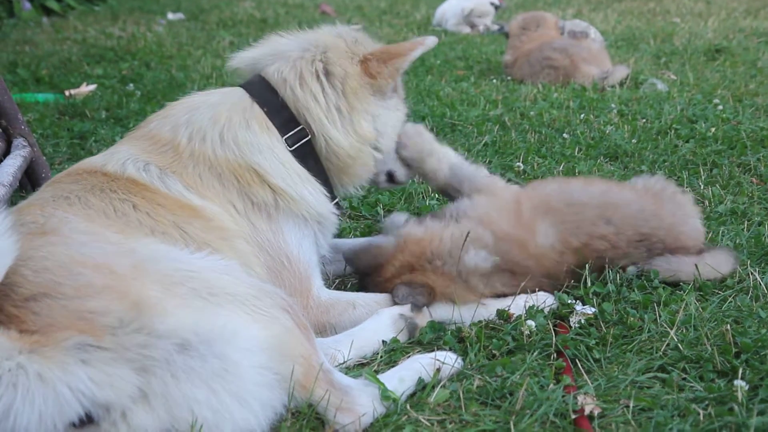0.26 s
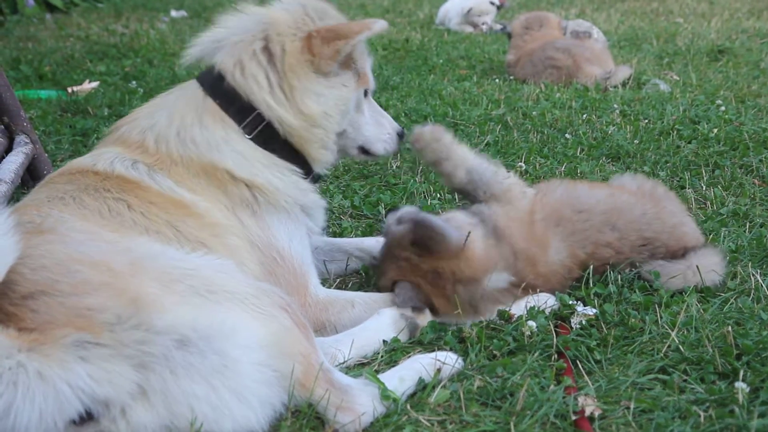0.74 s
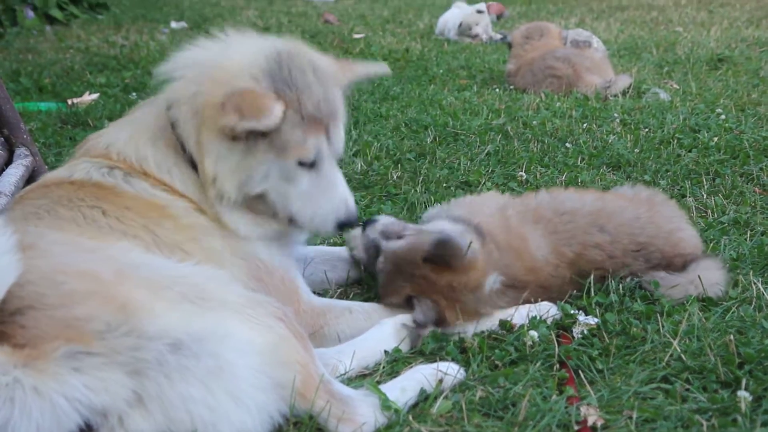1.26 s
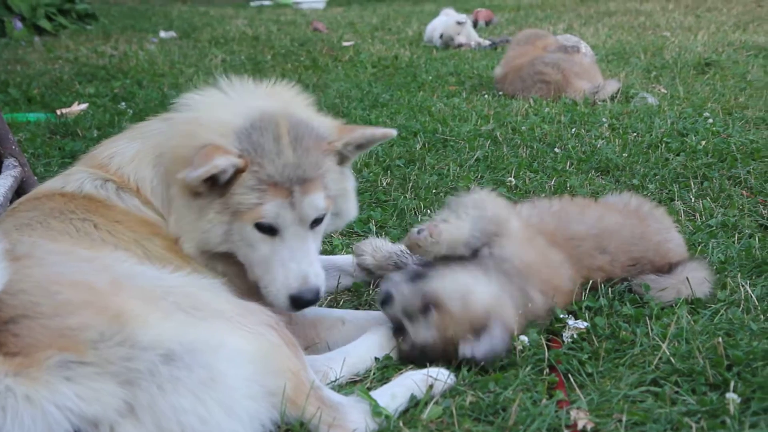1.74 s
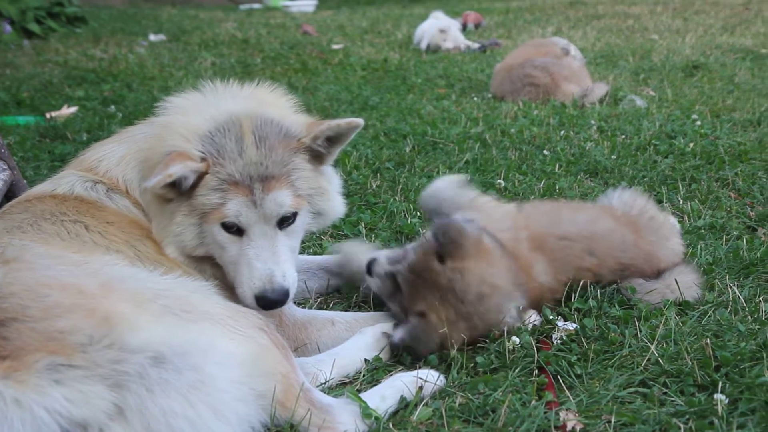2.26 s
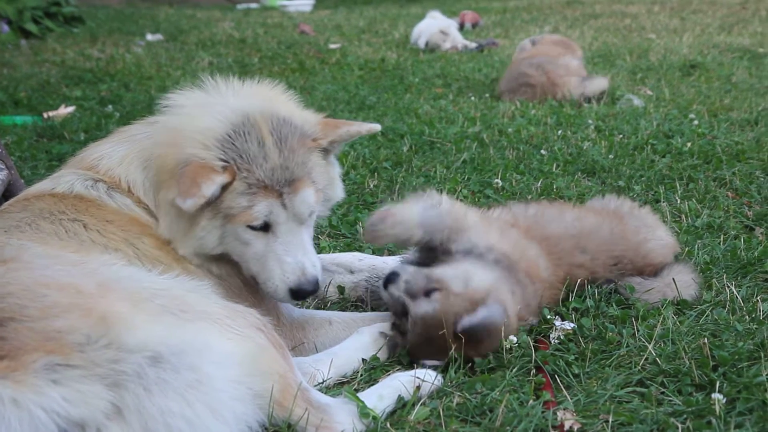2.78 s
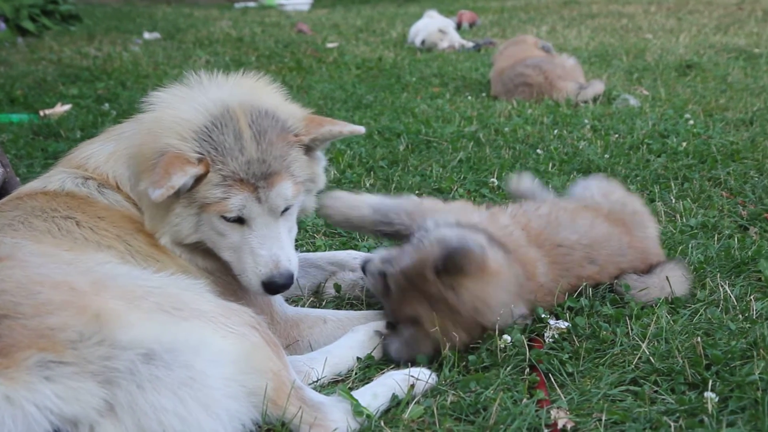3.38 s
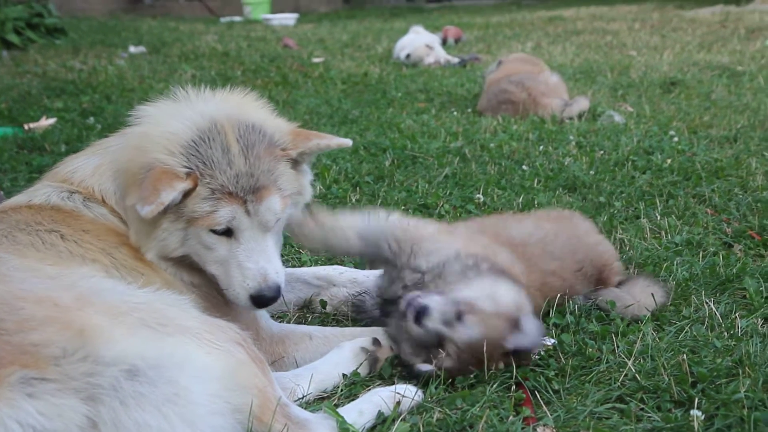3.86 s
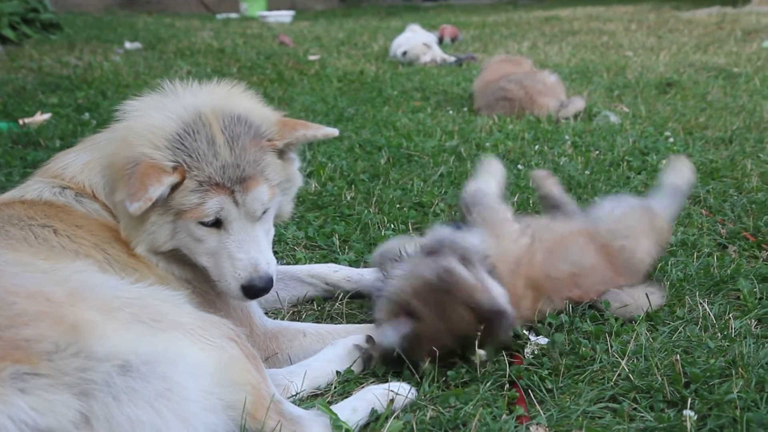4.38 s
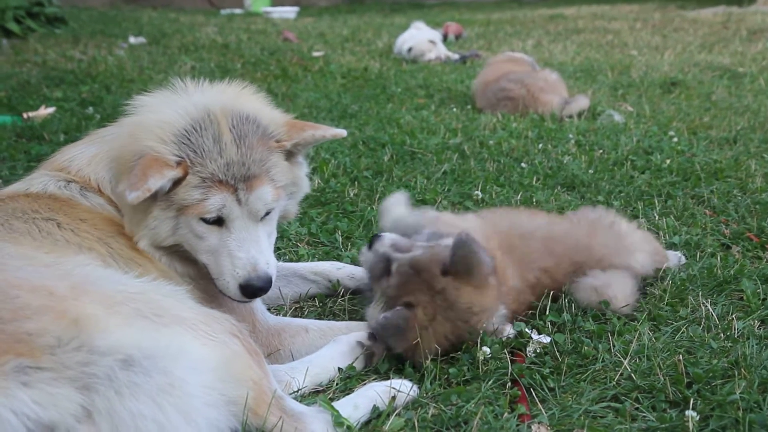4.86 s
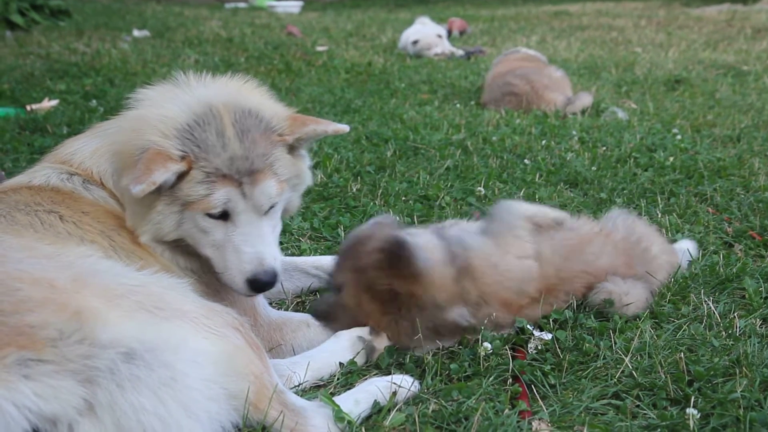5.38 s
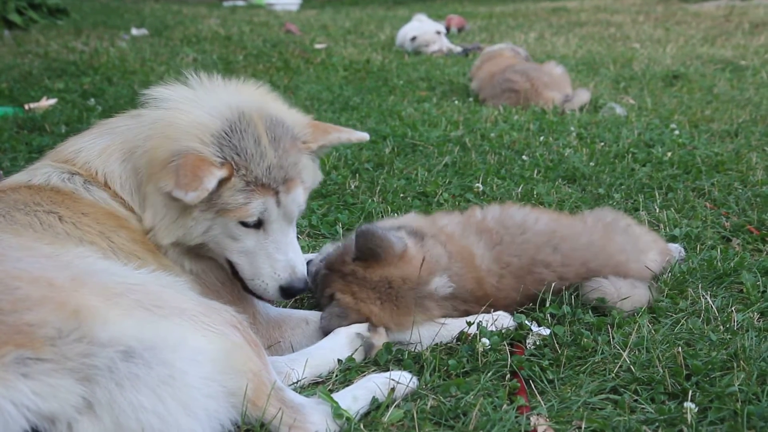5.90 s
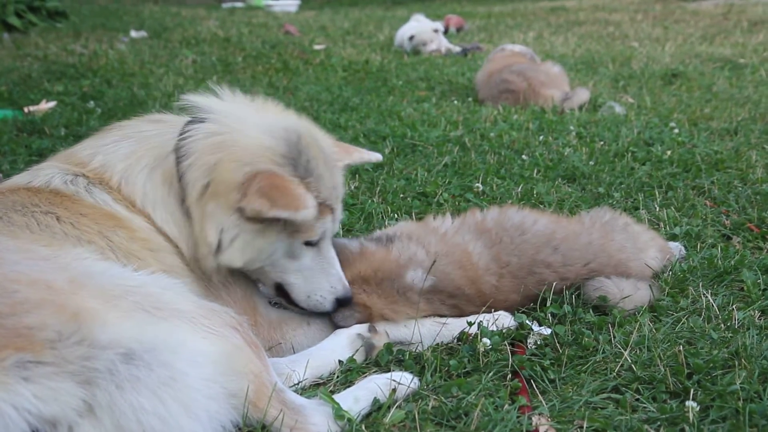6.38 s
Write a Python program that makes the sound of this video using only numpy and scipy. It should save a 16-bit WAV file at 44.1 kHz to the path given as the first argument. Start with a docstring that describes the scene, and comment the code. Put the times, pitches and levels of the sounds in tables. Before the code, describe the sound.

In a quiet garden, a short gritty scrape and dry grass ticks open the first 0.1 seconds. A soft mouth thump comes at 0.3, then a puppy's hollow pops and sharp tooth snaps at 1.1-1.9, a strong pop cluster at 2.6-2.8, and a snap at 3.0. After sparser contacts, loud pops and clacks bunch at 4.4-4.6, the heaviest smack lands at 5.2, and quick irregular mouthing runs from 5.4 to 6.0, thinning to the end at 6.6. Rolling grass rustle swells near 1.4, 3.6, 4.55, 5.05 and 5.95. Sparrows chirrup, double-note and trill in clear downward glides throughout, with cheeps between, echoing lightly. A grasshopper rasps rapidly until 1.1, again from 2.9 to 5.25, and from 5.45 onward, above constant far insect hiss, soft air, faint hum and a thin high whine. Mono, bites close and dry.

```python
"""Sharp snaps and hollow lip pops are heard as a puppy rolls and plays on a lawn, with rustling grass.
Each bite adds damped tones for head and mouth to short noise cracks for jaws and teeth.
Sparrows chirp in gliding whistles; a grasshopper buzzes in bouts of pulsed noise over a far insect hiss.
Filtered noise makes the outdoor air and hum, and a sine makes a thin high whine.
Short echoes from the ground and garden walls follow the bites and the birds."""
import sys
import numpy as np
from scipy import signal
from scipy.fft import rfft, irfft
from scipy.io import wavfile
from scipy.ndimage import uniform_filter1d, minimum_filter1d, map_coordinates

SR = 44100
rng = np.random.default_rng(int(sys.argv[2]) if len(sys.argv) > 2 else 0)


def wav_record(signal):
    """Record a signal, one row per channel, as 16-bit PCM in the file named by sys.argv[1]."""
    frames = np.transpose(np.atleast_2d(signal))
    bounded = np.clip(frames, -1, 1)
    # unit amplitude maps onto the largest positive 16-bit level
    quanta = np.round(bounded * 32767).astype(np.int16)
    wavfile.write(sys.argv[1], SR, quanta)


N = 292824
TIME = np.arange(N) / SR  # seconds

# Snaps and smacks of the puppy's mouth. Each row: start in seconds, head thump level in dB,
# hollow pop level in dB, pop pitch in Hz, jaw clack level in dB, tooth snap level in dB.
BITES = [(.32, -31, -37, 487, -59, -67), (1.074, -26.5, -26, 708, -70, -74),
         (1.327, -25.5, -30.5, 520, -28, -21.5), (1.389, -37, -28.5, 860, -34, -47),
         (1.539, -36, -41, 455, -51, -71), (1.803, -30.5, -31.5, 506, -24, -16.5),
         (1.853, -30, -24, 716, -21.5, -27), (1.878, -31, -32, 706, -21, -20.5),
         (2.178, -40, -43, 775, -49, -62), (2.623, -21.5, -14, 750, -33.5, -59),
         (2.694, -31.5, -20.5, 726, -23, -17.5), (2.783, -27.5, -33, 504, -64, -44),
         (3.002, -30.5, -27.5, 570, -22, -21.5), (3.485, -37, -44, 500, -46, -54),
         (3.704, -35, -31, 680, -30, -38), (3.83, -53, -37, 473, -40, -63),
         (4.138, -44.5, -41.5, 630, -52, -56), (4.402, -50, -44, 630, -36, -45),
         (4.457, -19, -14, 482, -32.5, -55), (4.462, -27, -17, 575, -38, -57),
         (4.609, -19, -13.5, 547, -16, -50), (4.617, -29, -13, 582, -19.5, -20),
         (4.624, -28, -15, 686, -57, -19.5), (4.848, -34, -34, 700, -58, -68),
         (4.88, -36, -37.5, 760, -64, -71), (4.958, -40, -30, 717, -52, -61),
         (4.985, -29.5, -25.5, 780, -31, -61), (5.015, -45, -27.5, 348, -33.5, -37),
         (5.198, -13, -10, 468, -16.5, -21), (5.447, -30, -24, 730, -36, -58),
         (5.458, -56, -22, 705, -31, -24.5), (5.475, -40, -18.5, 754, -26, -54),
         (5.576, -42, -27.5, 775, -33, -39), (5.667, -52, -30.5, 510, -45, -59),
         (5.726, -25.5, -23.5, 760, -27.5, -61), (5.851, -22, -22.5, 410, -21.5, -39),
         (5.873, -39, -24, 670, -47, -55), (5.883, -27, -19.5, 633, -29.5, -46),
         (5.947, -30, -28.5, 390, -25.5, -34), (6.02, -38, -27, 714, -35, -55),
         (6.255, -55, -39, 563, -45, -54), (6.578, -33.5, -36.5, 450, -62, -66)]
# Tone colour of the jaws closing. Each row: frequency in Hz, relative level in dB.
JAW_COLOUR = [(300, -73), (800, -6), (1200, 3.5), (1800, -1), (2800, 1), (3600, -4.5), (5000, -7),
              (9000, -14)]
# Tone colour of the teeth meeting. Each row: frequency in Hz, relative level in dB.
TOOTH_COLOUR = [(1000, -68), (3000, -4.5), (4500, 0), (5100, 2), (6000, 5.5), (8300, -0.5), (10500, -9.5),
                (12500, -11), (16000, -21)]
# The puppy's body rings on after each thump. Each row: pitch in Hz, level against the thump in dB,
# time to fade by 60 dB in seconds.
BODY_RINGS = [(156.5, -12.5, 0.081), (336.6, -15, 0.12)]
# A stronger pop tightens the thump. Each row: pop level in dB, settled thump pitch in Hz.
THUMP_PITCH = [(-39, 203), (-27, 274), (-19.5, 303)]
# Bare teeth meet bright, lips dull a soft contact. Each row: tooth snap level in dB, top edge in Hz.
CONTACT_EDGE = [(-21, 4940), (-20, 10500)]

# Fur dragging through grass. Each row: time in seconds, level in dB.
RUSTLE_LEVEL = [(0, -45.5), (.12, -41), (.16, -71), (1.0, -70), (1.4, -49.5), (2.0, -56), (2.9, -78),
                (3.6, -47), (4.2, -50.5), (4.55, -36.5), (4.75, -48), (5.05, -40.5), (5.35, -56.5),
                (5.95, -37), (6.2, -56), (6.64, -48)]
# Tone colour of the crumpling blades. Each row: frequency in Hz, relative level in dB.
GRASS_COLOUR = [(40, -22), (120, 2.5), (250, 9.5), (700, 3), (1500, -5.5), (4000, -3.5), (8000, -15),
                (16000, -77)]
# Dry ticks of grass stalks. Each row: start in seconds, level in dB.
STALK_TICKS = [(0.0422, -43), (0.048, -39), (0.072, -33.5), (0.1031, -33), (1.975, -45.5), (4.037, -53)]
# Tone colour of a stalk tick. Each row: frequency in Hz, relative level in dB.
TICK_COLOUR = [(500, 5), (1200, 3), (4000, 2), (8000, 7.5), (11000, 4.5), (16000, -12)]
# Tone colour of the gritty scrape. Each row: frequency in Hz, relative level in dB.
SCRAPE_COLOUR = [(100, -24), (500, -8), (880, 6), (1500, -2), (2200, -20), (6000, -9), (10000, -12),
                 (16000, -28)]

# Syllables of the sparrows' three phrases. Each row: start in seconds into the phrase,
# length in seconds, start pitch in Hz, middle pitch in Hz, end pitch in Hz, level against the phrase in dB.
# The pitches are those at pitch factor 1.
CHIRRUP_SYLLABLES = [(0, .047, 4080, 4647, 3580, 1), (0.059, 0.0342, 3515, 3107, 2660, -4.5),
                     (0.084, .035, 2800, 3700, 3000, -1)]
DOUBLE_SYLLABLES = [(0, .024, 5750, 6030, 6080, -11.5), (.034, .055, 4550, 4530, 3740, -1),
                    (.102, .058, 4624, 4580, 3195, 2.5), (.195, .022, 3320, 3850, 3500, -0.5)]
TRILL_SYLLABLES = [(0, .036, 6390, 5800, 5250, -15), (.04, .056, 3436, 4332, 3640, 0),
                   (.088, 0.03, 4220, 6080, 5180, -13.5), (.105, .055, 3707, 4457, 3107, 1),
                   (.152, .036, 6700, 6200, 5000, -19.5), (.177, .056, 3695, 4344, 2740, -3),
                   (.256, .033, 2740, 3400, 2800, -5.5)]
# Zigzag second voice of two phrases. The one row: start in seconds into the phrase, length in seconds,
# start pitch in Hz, end pitch in Hz, level against the phrase in dB. Pitches are at factor 1.
DOUBLE_WARBLE = (0.2, 0.03, 3398, 2948, 4)
TRILL_WARBLE = (0.13, 0.1343, 3551, 2951, -5)
# When each phrase is sung. Each row: start in seconds, pitch factor,
# level in dB before the birds' shared level.
CHIRRUP_CALLS = [(.401, 1, -36.5), (2.071, 1.02, -34.5), (4.103, .997, -32.5)]
DOUBLE_CALLS = [(2.493, 0.96, -40.5), (5.302, 0.99, -39.5), (5.624, 1.003, -38)]
TRILL_CALLS = [(.589, 1, -29.5), (2.949, 0.96, -32), (4.372, .995, -31.5), (5.816, 0.99, -30)]
# Single cheeps. Each row: start in seconds, length in seconds, top pitch in Hz,
# level in dB before the birds' shared level.
CHEEPS = [(1.105, .034, 5700, -54), (1.166, .045, 5080, -53), (1.497, 0.096, 4790, -51.5),
          (2.357, .03, 6400, -46.5), (2.391, 0.057, 4954, -39.5), (2.759, 0.068, 4960, -40.5),
          (2.848, .039, 4390, -38.5), (3.16, 0.032, 6200, -47), (3.193, 0.046, 4840, -37),
          (3.286, 0.032, 4410, -40), (3.719, 0.041, 3796, -33.5), (3.777, 0.025, 3460, -32),
          (3.813, 0.015, 3650, -31.5), (3.826, .06, 4300, -43), (3.856, 0.019, 3310, -35),
          (4.965, 0.022, 4900, -50), (5.024, 0.036, 4890, -42.5)]
# Low cheeps drop further at the end. Each row: top pitch in Hz, end pitch as a share of the top.
CHEEP_END = [(3400, 0.743), (4800, .89)]

# Bouts of the near grasshopper. Each row: start in seconds, end in seconds, level in dB.
BOUTS = [(-.1, 1.099, -54), (2.9, 5.26, -55), (5.443, 6.694, -54.5)]
# Tone colour of its wings. Each row: frequency in Hz, relative level in dB.
WING_COLOUR = [(5000, -47), (7000, -16), (8200, -4), (9000, -10), (10000, 1), (10800, -10), (12000, -20),
               (15000, -25)]
# Tone colour of the far insects. Each row: frequency in Hz, relative level in dB.
CHORUS_COLOUR = [(5000, -18), (7000, -8), (8200, 1.5), (10000, -1.5), (11200, -9.5), (13000, -24)]
# Tone colour of the steady garden air. Each row: frequency in Hz, relative level in dB.
AIR_COLOUR = [(20, -16), (50, 0.5), (100, 0), (200, 3.5), (400, -2.5), (800, -3.5), (1200, -8),
              (2000, -12.5), (2900, -24), (4300, -10.5), (6500, -17), (11000, -41), (13000, -32),
              (16000, -24)]
# Far machine hum. Each row: centre in Hz, width in Hz, level in dB.
HUM_BANDS = [(1410, 344, -51.5), (2670, 670, -57.5), (3356, 210, -52.5), (3640, 330, -56)]


def bites():
    """The puppy's snaps and smacks, one after another."""
    out = np.zeros(N)
    for start, *settings in BITES:
        add(out, start, bite(*settings))
    return out


def bite(thump_db, pop_db, pop_hz, clack_db, snap_db):
    """A bite thumps the head, rings the hollow of the mouth, and may clack the jaws and teeth."""
    t = np.arange(4096) / SR
    steady = np.ones(len(t))
    thump_hz = np.interp(pop_db, *np.transpose(THUMP_PITCH))
    edge_hz = np.interp(snap_db, *np.transpose(CONTACT_EDGE))

    # the thump starts 11 % high and quickly settles
    falling_hz = thump_hz * (1 + 0.11 * np.exp(-t / 0.0036))
    thump = ring(t, falling_hz, t60=0.026, rise=0.0015)
    for hz, db, t60 in BODY_RINGS:
        thump += amp(db) * ring(t, hz * steady, t60, rise=0.005)

    pop = ring(t, pop_hz * steady, t60=0.017, rise=0.0006)
    second_mode = ring(t, 1.403 * pop_hz * steady, t60=0.013, rise=0.00006)
    pop += amp(-9) * second_mode

    clack = crack(t, JAW_COLOUR, edge_hz, decay=0.003, bounce_db=-22, bounce_s=0.0087, bounce_decay=0.0029)
    snap = crack(t, TOOTH_COLOUR, edge_hz, decay=0.002, bounce_db=-12.5, bounce_s=0.0045,
                 bounce_decay=0.0032)
    return amp(thump_db) * thump + amp(pop_db) * pop + amp(clack_db) * clack + amp(snap_db) * snap


def ring(t, hz, t60, rise):
    """A soft-edged fading tone whose pitch may move; like any small source it radiates no deep bass."""
    tone = np.sin(2 * np.pi * np.cumsum(hz) / SR)
    fade = amp(-60 * t / t60)
    onset = 1 - np.exp(-t / rise)
    bass_cut = signal.butter(2, hz[-1] / 2, "high", fs=SR)
    return burst(signal.lfilter(*bass_cut, tone * fade * onset))


def crack(t, points, edge_hz, decay, bounce_db, bounce_s, bounce_decay):
    """A hard contact, dulled above edge_hz, and its scattered bounce off the ground."""
    late = np.maximum(t - bounce_s, 0) / bounce_decay
    bounce = amp(bounce_db) * late * np.exp(1 - late)
    shape = np.exp(-t / decay) + bounce
    contact = colour(rng.standard_normal(len(t)) * shape, points)
    return burst(signal.lfilter(*signal.butter(2, edge_hz, fs=SR), contact))


def grass():
    """Blades crumple in clumps of tiny clicks under the rolling puppy; a few stalks tick."""
    clumps = amp(4.5 * wander(40, N))
    clicks = rng.random(N) < 4000 / SR  # about 4000 a second
    grains = rng.standard_normal(N) * clicks * clumps
    level = amp(np.interp(TIME, *np.transpose(RUSTLE_LEVEL)))
    out = evened(colour(grains, GRASS_COLOUR)) * level

    tick_fade = np.exp(-np.arange(1024) / SR / .0007)
    for start, db in STALK_TICKS:
        tick = colour(rng.standard_normal(len(tick_fade)) * tick_fade, TICK_COLOUR)
        add(out, start, amp(db) * burst(tick))
    return out


def scrape(db=-42):
    """A short gritty scrape in the grass as the play begins: noise of quickly wandering strength."""
    gate = np.interp(TIME, [.095, .115], [1, 0])
    grit = rng.standard_normal(N) * amp(3.3 * wander(320, N))
    return amp(db) * gate * evened(colour(grit, SCRAPE_COLOUR))


def sparrows():
    """Chirrups, double notes and trills, along with single cheeps, all sung as gliding whistles."""
    out = phrases(CHIRRUP_CALLS, CHIRRUP_SYLLABLES)
    out += phrases(DOUBLE_CALLS, DOUBLE_SYLLABLES, DOUBLE_WARBLE)
    out += phrases(TRILL_CALLS, TRILL_SYLLABLES, TRILL_WARBLE)
    for start, length, top_hz, db in CHEEPS:
        start_hz = .92 * top_hz
        end_hz = top_hz * np.interp(top_hz, *np.transpose(CHEEP_END))
        add(out, start, amp(db) * syllable(length, start_hz, top_hz, end_hz))
    return out


def phrases(calls, syllables, second_voice=None):
    """Sings one phrase again and again, each time at its own pitch and strength."""
    out = np.zeros(N)
    for start, pitch, call_db in calls:
        for at, length, start_hz, middle_hz, end_hz, db in syllables:
            note = syllable(length, pitch * start_hz, pitch * middle_hz, pitch * end_hz)
            add(out, start + at, amp(call_db + db) * note)
        if second_voice:
            at, length, start_hz, end_hz, db = second_voice
            note = warble(length, pitch * start_hz, pitch * end_hz)
            add(out, start + at, amp(call_db + db) * note)
    return out


def syllable(length, start_hz, middle_hz, end_hz, middle_at=0.413, push_db=4):
    """One side of the syrinx, the bird's voice organ, glides from start through middle to end pitch."""
    u = np.linspace(0, 1, round(length * SR))  # share of the syllable passed
    side = np.interp(u, [0, middle_at, 1], [1, 0, 1])
    nearness = 1 - side ** 1.6  # 1 at the middle pitch, 0 at either end
    outer_hz = np.where(u < middle_at, start_hz, end_hz)
    push = amp(push_db * (u - .5))  # the bird leans into the second half
    rasp = np.interp(middle_hz, [4700, 5800], [.02, .06])  # the highest notes are squeezed and raspy
    return push * whistle(outer_hz + (middle_hz - outer_hz) * nearness, rasp)


def warble(length, start_hz, end_hz, warble_hz=38, warble_depth=0.0985):
    """The other side of the syrinx zigzags down beside the main whistle."""
    size = round(length * SR)
    turns = np.cumsum(warble_hz * (1 + 0.18 * wander(41.5, size))) / SR
    zigzag = 1 + warble_depth * np.cos(2 * np.pi * turns)
    return whistle(np.linspace(start_hz, end_hz, size) * zigzag, waver=0.02)


def whistle(hz, waver, flutter_db=3, overtone_db=-32):
    """A bird tone on a pitch track; the stronger its quick random tremble, the raspier it sounds."""
    size = len(hz)
    phase = 2 * np.pi * np.cumsum(hz * (1 + waver * wander(703.0, size))) / SR
    tone = np.sin(phase) + amp(overtone_db) * np.sin(2 * phase)
    edges = signal.windows.tukey(size, 1 / 6)
    flutter = amp(flutter_db * wander(242.5, size))
    return evened(edges * flutter * tone)


def garden(x, near_db, near_t60, wall_db, wall_s, wall_t60):
    """Scatter from things close by, and a swell of echoes from the walls building up over wall_s."""
    t = np.arange(SR // 2) / SR
    taps = rng.choice([-1., 1.], len(t)) * (rng.random(len(t)) < 4000 / SR)
    near = taps * (t > .004) * amp(-60 * t / near_t60)
    walls = taps * np.minimum(t / wall_s, 1) ** 4 * amp(-60 * t / wall_t60)
    echo = amp(near_db) * near / np.linalg.norm(near)
    echo += amp(wall_db) * walls / np.linalg.norm(walls)
    return x + signal.fftconvolve(x, echo)[:N]


def grasshopper(strokes_per_s=37.2, stroke_width=0.27, bout_edge_s=0.064, chorus_db=-54):
    """One near insect rasps in bouts, once a wing stroke, over the hiss of many far ones."""
    near = np.zeros(N)
    for start, end, db in BOUTS:
        turns = np.cumsum(strokes_per_s * (1 + 0.01 * wander(11, N))) / SR
        strokes = np.exp(-((turns % 1 - .5) / stroke_width) ** 2 / 2)
        gate = np.clip(np.minimum(TIME - start, end - TIME) / bout_edge_s, 0, 1)
        rasp = evened(colour(strokes * rng.standard_normal(N), WING_COLOUR))
        near += amp(db) * gate * rasp
    chorus = evened(colour(rng.standard_normal(N), CHORUS_COLOUR))
    return near + amp(chorus_db) * chorus * amp(1.0 * wander(70, N))


def background(air_db=-49, whine_db=-61, whine_hz=15648):
    """Outdoor air as shaped noise, far hum as narrow noise bands, and a thin electrical whine."""
    air = evened(colour(rng.standard_normal(N), AIR_COLOUR))
    out = amp(air_db) * air * amp(0.4 * wander(16, N))
    hz = np.fft.rfftfreq(N, 1 / SR)
    for centre, width, db in HUM_BANDS:
        band = np.exp(-2 * ((hz - centre) / width) ** 2)
        out += amp(db) * evened(irfft(rfft(rng.standard_normal(N)) * band, N))
    return out + amp(whine_db) * evened(np.sin(2 * np.pi * whine_hz * TIME))


def amp(db):
    """Turns decibels into a plain multiplier."""
    return 10 ** (np.asarray(db) / 20)


def evened(x):
    """Scales a sound to an average (RMS) level of one."""
    return x / np.sqrt(np.mean(x ** 2) + 1e-20)


def burst(x):
    """Scales a short sound to the energy of a hundredth of a second at an RMS level of one."""
    return x * np.sqrt(SR / 100 / np.sum(x ** 2))


def add(mix, start, sound):
    """Mixes a sound in at a start time in seconds, cutting what runs past the end."""
    part = mix[max(round(start * SR), 0):][:len(sound)]
    part += sound[:len(part)]


def colour(x, points, size=2048):
    """Filters through the (Hz, dB) points with minimum delay, so nothing sounds before its cause."""
    hz, db = np.transpose(points)
    grid_hz = abs(np.fft.fftfreq(size, 1 / SR)) + 1
    log_gain = np.log(amp(np.interp(np.log(grid_hz), np.log(hz), db)))
    # the Hilbert transform finds the phase that goes with this gain
    taps = np.fft.ifft(np.exp(np.conj(signal.hilbert(log_gain)))).real[:size // 2]
    return signal.fftconvolve(x, taps)[:len(x)]


def wander(rate, size):
    """A smooth random curve of roughly unit spread, changing about rate times a second."""
    at = np.arange(size) * rate / SR
    return map_coordinates(rng.standard_normal(4096), [at], order=2, mode="wrap")


def scene():
    """Sets puppy and birds in the garden's echoes and mixes in the other layers."""
    puppy = garden(bites(), near_db=-10.0, near_t60=0.043, wall_db=-16.0, wall_s=0.035, wall_t60=0.29)
    birds = garden(sparrows(), near_db=-1, near_t60=0.11, wall_db=-7.5, wall_s=0.046, wall_t60=0.36)
    mix = puppy + grass() + scrape() + amp(-2.0) * birds + grasshopper() + background()
    return mix[None]  # one channel


def record(dry):
    """A fast limiter turns down peaks above full level; then a filter removes the highest treble."""
    gain = 1 / np.maximum(abs(dry), 1)
    gain = uniform_filter1d(minimum_filter1d(gain, size=61), size=61)
    treble_cut = signal.firwin(511, 16300, window=("kaiser", 9), fs=SR)  # edge in Hz
    return signal.oaconvolve(dry * gain, treble_cut[None], "same")


dry = scene()
out = record(dry)
wav_record(out)
```